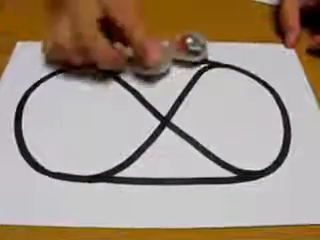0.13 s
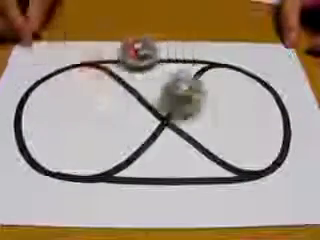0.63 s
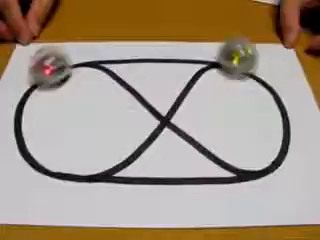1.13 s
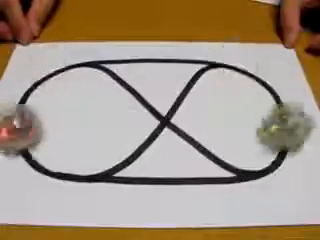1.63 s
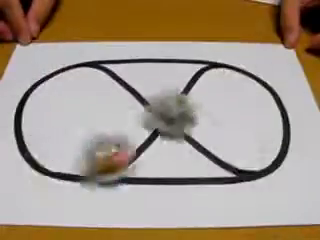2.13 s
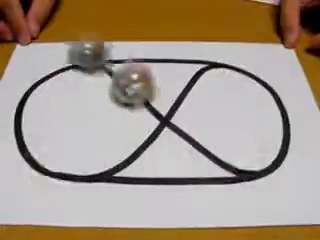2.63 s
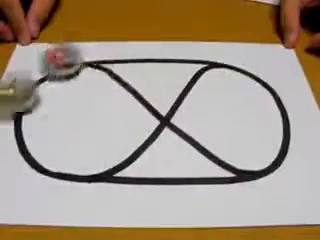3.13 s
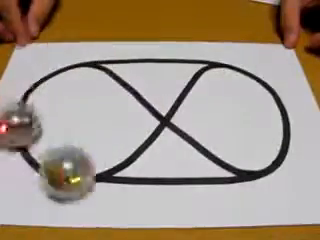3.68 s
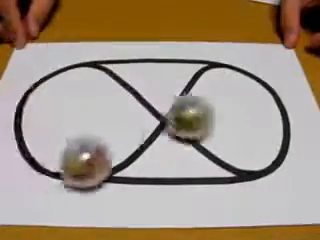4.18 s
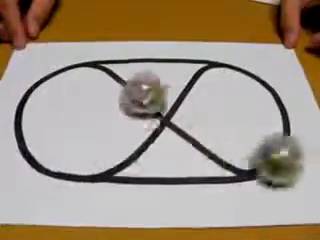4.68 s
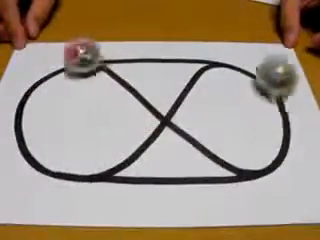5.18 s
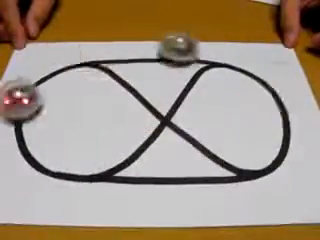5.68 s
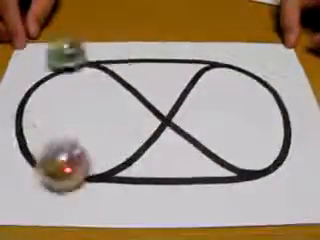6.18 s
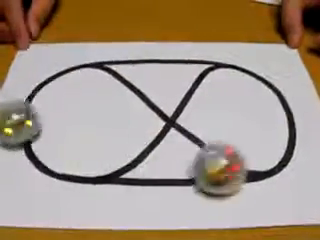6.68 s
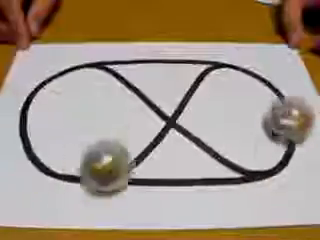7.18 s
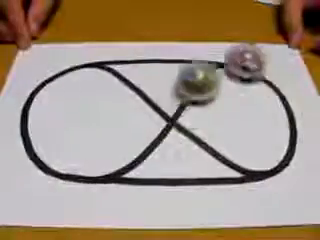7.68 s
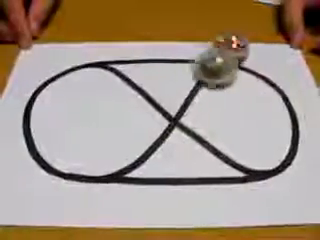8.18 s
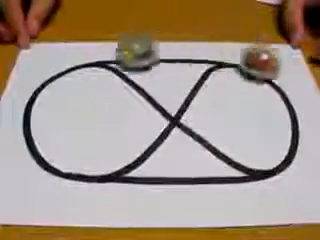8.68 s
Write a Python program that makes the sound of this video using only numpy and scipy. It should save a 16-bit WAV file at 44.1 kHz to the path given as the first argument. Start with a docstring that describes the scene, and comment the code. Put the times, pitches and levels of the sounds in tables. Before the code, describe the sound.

Two tiny geared toy robots whirr with a steady gritty hiss across paper on a wooden table, ticking, rattling, then bumping together near the end.

```python
"""Two palm-sized toy robots whirr round a sheet of paper on a wooden table, close to a stereo microphone.
From the start, random tooth contacts ring shells and gear boxes, wheels scrape paper, the table hums and rumbles.
Shells tick throughout; filtered blows bump the table near 0.45 s, a few softer ones follow.
Turns raise the gear box rattle, strongly round 4.2 s and 6.5 s.
From 7.9 s bumps crowd together and the robots shove each other, scuffing the table in three swells."""
import sys
import numpy as np
from scipy import signal
from scipy.fft import rfft, irfft, next_fast_len
from scipy.io import wavfile
from scipy.ndimage import uniform_filter1d, map_coordinates

SR = 44100
rng = np.random.default_rng(int(sys.argv[2]) if len(sys.argv) > 2 else 0)


def transcribe(u):
    """Save the signal u as a 16-bit wav file named by the first command-line argument.

    u: samples, shape (n,) or (channels, n), limited to [-1, 1]; the rate is SR.
    q: integer samples, one column per channel.
    """
    v = np.clip(np.atleast_2d(u).T, -1, 1)
    q = np.round(v * 32767).astype(np.int16)
    wavfile.write(sys.argv[1], SR, q)


def volts(x):
    """Linear amplitude factor 10**(x/20) for a level x in dB, scalar or array-like."""
    e = np.asarray(x, float) / 20
    return 10 ** e


N = 389403

# table-top modes: centre_hz, width_hz, gain_db
TABLE_MODES = [(196, 12, 6), (319.5, 17.64, 0), (500, 148, 0.5), (813, 160, -3.5), (1030, 48, -0.5)]
# table hum swells: middle_s, length_s, lowest_mode_rise_db, second_mode_rise_db
HUM_SWELLS = [(.23, 0.24, 15.5, 8), (.5, 0.38, 12.5, -1), (1.0, 0.95, 9, -1.5), (1.42, .2, 9.5, 0),
              (1.8, 0.17, 2.5, 12), (2.65, 0.7, 10.5, 4), (3.12, 0.44, 13, 3.5), (3.42, 0.54, 15.5, 6),
              (4.3, 0.35, -4, 5.5), (4.86, 0.14, 14.5, -5), (5.22, 0.16, 14, 4), (5.47, 0.34, 14, 6),
              (5.83, 0.76, 13.5, 1), (6.2, 0.13, 10.5, 1), (6.65, 0.16, 12.5, -2), (6.98, .3, 6.5, -2),
              (7.75, 0.3, 6.5, 0), (8.12, 0.75, 12.5, 10), (8.32, 0.16, 1.5, 14), (8.46, 0.24, 8, 18.5),
              (8.6, 0.17, 8, 11.5), (8.83, 0.19, 15, -9)]
# rolling rumble spectrum: freq_hz, gain_db
ROLL_SPECTRUM = [(15, -55), (40, -47), (86, -12.5), (189, -3.5), (228, -6.5), (316, -7.5), (537, -9.5),
                 (575, -9.5), (1060, -11.5), (1500, -9.5), (1950, -38), (3300, -120)]
# robots shove each other and scuff the table: middle_s, length_s, scuff_rise_db
SCUFFLES = [(8.06, .3, 16), (8.25, 0.13, 13), (8.47, .36, 17)]
# bumps on the table: start_s, level_db, lowpass_hz (higher = harder blow)
BUMPS = [(0.4417, -16, 2000), (0.458, -13, 696), (0.48, -25, 900), (0.495, -22, 600), (0.511, -25.5, 300),
         (0.536, -22, 300), (1.413, -22, 595), (3.5, -22.5, 405), (4.284, -23.5, 506), (5.464, -21, 700),
         (5.996, -25, 400), (7.915, -20.5, 1200), (8.028, -17.5, 650), (8.046, -18, 496), (8.077, -21, 900),
         (8.097, -19.5, 300), (8.212, -23.5, 595), (8.237, -24, 710), (8.375, -27, 700), (8.43, -22, 700),
         (8.45, -24.5, 500), (8.478, -22, 900), (8.53, -30.5, 690)]
# shell ticks: start_s, peak_db (ahead of the microphone)
TICKS = [(0.0416, -10.5), (0.453, -8), (0.46, -11), (1.3835, -16), (1.422, -13.5), (1.868, -8.5),
         (2.2374, -7), (2.2415, -9.5), (2.3499, -5.5), (2.8572, -12), (3.1428, -16), (3.1617, -6.5),
         (3.495, -10.5), (3.926, -13), (4.1161, -6.5), (4.262, -7.5), (4.4857, -10), (5.032, -8.5),
         (5.8106, -16.5), (6.1217, -8), (6.1623, -13), (6.43, -7), (6.519, -6.5), (6.966, -8.5),
         (7.087, -14), (7.1601, -11.5), (7.848, -12), (7.8876, -5.5), (8.0417, -10), (8.1365, -17),
         (8.3659, -12), (8.4832, -13.5), (8.678, -12)]
# heavily damped shell wall under a tick: centre_hz, width_hz, gain_db
TICK_MODES = [(2000, 600, 3.5), (3400, 900, -1.5)]
# wheels and skid on paper, spectrum: freq_hz, gain_db
PAPER_SPECTRUM = [(2500, -35.5), (4000, -6.5), (5500, -7), (6500, -7), (7200, -14.5), (7600, -16),
                  (7900, -52), (9000, -83)]
# gear box modes, response squared in use: centre_hz, width_hz, gain_db
BOX_MODES = [(3732, 540, 4), (4800, 1970, 1.5)]
# hollow shell modes, response squared in use: centre_hz, width_hz, gain_db
SHELL_MODES = [(1652, 750, 2), (2134, 670, 5.5), (2450, 633, -5.5), (2780, 497, -2.5), (3450, 720, -8.5)]
# narrow buzzing shell mode, response squared in use: centre_hz, width_hz, gain_db
BUZZ_MODE = [(1989, 240, -1.5)]
# nearness and facing of the robots: time_s, whirr_level_db, brightness_db
NEARNESS = [(0, -24.5, 1.5), (.3, -26.5, 1.5), (.65, -24, 0), (1.1, -23.5, 0), (1.22, -24, 1.5),
            (1.5, -23, 0), (2.0, -24.5, 0), (2.55, -22, -1), (3.05, -24.5, 1.5), (3.5, -22.5, 0),
            (3.85, -22, -1.5), (4.4, -24, 1), (4.9, -23, -1.5), (5.25, -25, 1), (5.6, -25.5, 2),
            (5.95, -22, 0), (6.4, -24, 0.5), (6.9, -22, -1.5), (7.4, -24.5, -2), (7.7, -25, -0.5),
            (8.0, -25, 0.5), (8.2, -23.5, -2), (8.55, -25, 0), (8.83, -25, 2)]
# a wheel labours through a turn (negative = dip): middle_s, length_s, rattle_rise_db, chatter_rise_db
TURNS = [(0.0, 0.035, 12.5, 4), (.17, 0.24, 6.5, 3), (.315, 0.027, -5.5, -4.5), (.47, 0.17, 4, -0.5),
         (.6, 0.18, 5, 1), (.87, 0.076, 5.5, 1.5), (1.0, 0.06, 7.5, 1), (1.2, 0.14, -3, -3.5),
         (1.27, 0.051, 5.5, -0.5), (1.42, 0.052, 9.5, -1.5), (1.69, 0.13, -0.5, 3), (1.89, 0.17, 5, 2),
         (2.09, 0.18, 9, 4), (2.26, 0.17, 10.5, 3.5), (2.33, 0.044, -3.5, -3.5), (2.37, 0.063, 3.5, 3.5),
         (3.0, 0.25, -0.5, 2.5), (3.17, 0.11, 6.5, 0.5), (3.48, 0.15, -1, 1), (3.95, 0.18, 7.5, 1.5),
         (4.18, 0.17, 11, 2.5), (4.35, 0.16, 9.5, 3), (4.5, 0.091, 0.5, 3), (4.62, 0.031, 0, -5.5),
         (4.7, 0.07, 0.5, 3), (5.04, 0.084, 2, -3), (5.3, 0.26, 5, 1.5), (5.5, 0.086, 7, 3),
         (5.69, 0.092, 2.5, 3.5), (6.03, 0.16, 3.5, 1), (6.21, 0.12, 6.5, 1), (6.39, 0.28, 10, 3),
         (6.53, 0.31, 12.5, 2), (6.6, 0.057, 1.5, 2), (6.64, .04, -4, -5), (6.69, 0.18, 8, 0.5),
         (6.85, 0.21, 6, 2), (6.96, 0.14, 9, 0.5), (7.1, 0.093, 4, 3), (7.19, 0.16, 2.5, 2.5),
         (7.33, 0.12, 2.5, 6), (7.385, 0.056, -2.5, -0.5), (7.47, 0.11, 0.5, 2.5), (7.57, 0.066, -2, 2),
         (7.86, 0.13, 2.5, 1.5), (7.99, 0.066, -1.5, -1.5), (8.045, 0.06, 7, 1), (8.11, 0.089, 1, 2),
         (8.675, 0.1, 6, 5.5)]
# left-right correlation: freq_hz, correlation (0-1)
LIKENESS = [(60, .9), (200, 0.98), (800, 0.94), (1250, 0.96), (2000, 0.94), (2700, 0.92), (3200, 0.98),
            (3800, 0.63), (4500, 0.3), (5500, 0.38), (7300, 0.3)]
# microphone response: freq_hz, gain_db
MIC_RESPONSE = [(20, -0.5), (6500, 1), (7300, -0.5), (7700, -18.5), (8000, -23), (9500, -87)]
# left over right capsule level: freq_hz, difference_db
CAPSULE_BALANCE = [(60, -0.5), (200, -1), (660, -1.5), (2200, 0.5), (7330, 1)]
# left over right capsule phase: freq_hz, lead_rad
CAPSULE_LEAD = [(900, 0), (1900, .17), (2700, .15), (3500, .04), (7500, -.02)]


def unit(x):
    """Scaled to rms 1."""
    return x / np.sqrt(np.mean(x ** 2) + 1e-20)


def along(points, hz):
    """(freq_hz, value) points interpolated on a log-frequency axis."""
    point_hz, value = np.transpose(points)
    return np.interp(np.log(hz + 1), np.log(point_hz + 1), value)


def curves(rows):
    """One value per sample for each column after time_s."""
    time_s, *columns = np.transpose(rows)
    return [np.interp(np.arange(N) / SR, time_s, column) for column in columns]


def swells(rows):
    """Sum of raised-cosine swells; one dB curve per column after middle_s, length_s."""
    out = np.zeros((len(rows[0]) - 2, N))
    for middle_s, length_s, *rise_db in rows:
        first = max(int((middle_s - length_s / 2) * SR), 0)
        last = min(int((middle_s + length_s / 2) * SR), N)
        k = np.arange(first, last)
        out[:, k] += np.outer(rise_db, np.cos(np.pi * (k / SR - middle_s) / length_s) ** 2)
    return out


def wobble(knots_per_s):
    """Smooth random curve: spline through Gaussian knots."""
    knots = rng.standard_normal(int(N * 200 / SR))
    return map_coordinates(knots, [np.arange(N) * min(knots_per_s, 190) / SR])


def noise():
    """White noise, direct and scattered."""
    return rng.standard_normal((2, N))


def filtered(x, response):
    """x through a complex frequency response."""
    size = next_fast_len(N + SR // 2)
    return irfft(rfft(x, size) * response(np.fft.rfftfreq(size, 1 / SR)), size)[..., :N]


def shaped(x, spectrum):
    """x through a (freq_hz, gain_db) spectrum."""
    return filtered(x, lambda hz: volts(along(spectrum, hz)))


def modes(table):
    """Causal response of parallel resonances, alternating in sign."""
    def response(hz):
        total = 0
        for k, (centre_hz, width_hz, gain_db) in enumerate(table):
            damping = 1j * hz * width_hz
            total = total + (-1) ** k * volts(gain_db) * damping / (centre_hz ** 2 - hz ** 2 + damping)
        return total
    return response


def steep(table):
    """Squared modal response: steep skirts, as a small shell radiates no bass."""
    return lambda hz: modes(table)(hz) ** 2


def contacts(per_s, spread_db):
    """Direct and scattered: two unrelated random impulse trains; spread_db scales an exponential level draw."""
    hit = rng.random((2, N)) < per_s / SR
    draw = np.minimum(rng.exponential(size=(2, N)), 4)
    return unit(hit * rng.standard_normal((2, N)) * volts(spread_db * draw))


def shifting(x, fine_db, wide_db):
    """Random shifting colour: random gain ripples over narrow and wide bands, drifting in time; rms 1."""
    z = signal.stft(x, nperseg=2048)[2]

    def field(bins, frames):
        grain = uniform_filter1d(rng.standard_normal(z.shape[1:]), bins, 0)
        return unit(uniform_filter1d(grain, frames, 1))

    gain_db = fine_db * field(bins=2, frames=4) + wide_db * field(bins=12, frames=7)
    return unit(signal.istft(z * volts(gain_db), nperseg=2048)[1][:, :N])


def spread(pair):
    """Direct and scattered signals become left and right with the tabled correlation."""
    def angle(hz):
        return np.arccos(np.clip(along(LIKENESS, hz), -1, 1)) / 2

    mid, side = filtered(pair, lambda hz: np.array([np.cos(angle(hz)), np.sin(angle(hz))]))
    return np.array([mid + side, mid - side])


def deep_bass():
    """Lumpy low-passed noise."""
    lumpy = volts(3 * wobble(3.6)) * noise()
    return volts(-63.5) * unit(filtered(lumpy, lambda hz: (hz > 18) / (1 + (hz / 90) ** 4)))


def rolling_rumble():
    """Wheels rolling: shaped noise of wavering level."""
    roll = shifting(shaped(noise(), ROLL_SPECTRUM), fine_db=2.0, wide_db=0.28)
    return volts(-37.5 + 0.98 * wobble(13) + 0.9 * wobble(5)) * roll


def hum(centre_hz, width_hz, waver, lumpy_db):
    """Motor-driven table mode: lumpy tone wavering by a share of its width, direct and scattered."""
    cycles = [np.cumsum(centre_hz + waver * width_hz * wobble(14)) / SR for _ in range(2)]
    return np.sqrt(2) * volts(lumpy_db * wobble(25)) * np.sin(2 * np.pi * np.array(cycles))


def table_hum():
    """Motor shaking hums in the two lowest table modes and swells."""
    low_db, second_db = swells(HUM_SWELLS)
    low = hum(*TABLE_MODES[0][:2], waver=0.6, lumpy_db=2.4)
    second = hum(*TABLE_MODES[1][:2], waver=0.5, lumpy_db=3)
    return volts(-55 + low_db) * low + volts(-55 + second_db) * second


def scuffing():
    """Sparse contacts ring the middle table modes, louder as the robots shove each other."""
    scuff = unit(filtered(contacts(300, spread_db=2.0), steep(TABLE_MODES[1:4])))
    return volts(-56.5 + swells(SCUFFLES)[0]) * scuff


def bumps():
    """Low-passed blow plus decaying chatter rings all table modes and a broad bass shudder."""
    chatter_t60_s, strike_over_chatter_db = 0.09, 11.5
    push = np.zeros((2, N + SR))
    t_s = np.arange(SR // 5) / SR
    for start_s, level_db, lowpass_hz in BUMPS:
        soft = signal.butter(2, lowpass_hz, fs=SR)
        strike = signal.lfilter(*soft, t_s == 0)
        chatter = unit(signal.lfilter(*soft, rng.standard_normal((2, len(t_s)))))
        chatter = chatter * volts(-60 * t_s / chatter_t60_s)
        blow = chatter + volts(strike_over_chatter_db) * strike / strike.max()
        push[:, round(start_s * SR):][:, :len(t_s)] += volts(level_db - 5.5) * blow
    shudder = modes([(60, 60, -14.5)])  # centre_hz, width_hz, gain_db
    return filtered(push[:, :N], lambda hz: modes(TABLE_MODES)(hz) + shudder(hz))


def ticks():
    """Each tick is a hard blow and one bounce on the damped shell wall."""
    low_hz, high_hz, bounce_s = 1500, 4500, 0.00095
    blow, starts = np.zeros(N), np.zeros(N)
    blow[[0, round(bounce_s * SR)]] = 1, 0.6

    def wall(hz):
        return modes(TICK_MODES)(hz) * hz / (hz - 1j * low_hz) / (1 + 1j * hz / high_hz)

    tick = filtered(blow, wall)[:SR // 20]
    for start_s, peak_db in TICKS:
        starts[round(start_s * SR)] = volts(peak_db)
    return signal.fftconvolve(starts, tick / np.abs(tick).max())[:N]


def paper_scrape(bright_db, turn_db):
    """Wheels and skid on paper: dense contacts, shaped, rising with part of the turn's rattle."""
    scrape = shifting(shaped(contacts(8000, spread_db=2.5), PAPER_SPECTRUM), fine_db=3.0, wide_db=2.5)
    level_db = -10.5 + 1.9 * bright_db + 0.49 * np.outer([1, 0.3], turn_db)  # direct, scattered
    return volts(level_db + 1.6 * wobble(22) + 0.83 * wobble(6.4)) * scrape


def gear_box(teeth, bright_db, turn_db):
    """Tooth contacts rattle the gear box, mostly direct; sparser hard ones click in it."""
    drive = teeth + 0.99 * contacts(2500, spread_db=3.0)
    rattle = shifting(filtered(drive, steep(BOX_MODES)), fine_db=2.5, wide_db=2.5)
    rattle = rattle * volts([[0], [-6.5]])  # direct, scattered
    clicks = unit(filtered(contacts(500, spread_db=2.5), steep(BOX_MODES)))
    clicks = clicks * volts([[0], [-9]])
    rattle_db = -11.5 + 0.5 * bright_db + turn_db + 1.3 * wobble(30)
    return volts(rattle_db) * rattle + volts(-17 + 1.05 * turn_db) * clicks


def shells(teeth, bright_db, chatter_db):
    """Tooth contacts ring lower and upper shell modes; sparser ones knock; the load flutters."""
    flutter = wobble(20)
    lower = filtered(teeth, lambda hz: steep(SHELL_MODES[:2])(hz) + steep(BUZZ_MODE)(hz))
    lower = shifting(lower, fine_db=4.0, wide_db=1.0)
    upper = shifting(filtered(teeth, steep(SHELL_MODES[2:])), fine_db=2.5, wide_db=0.83)
    knocks = unit(filtered(contacts(450, spread_db=-0.5), steep(SHELL_MODES)))
    # shells turned to the microphone: upper modes up, lower modes down
    lower_db = -5 - 0.46 * bright_db + chatter_db + 0.16 * flutter + 0.45 * wobble(6.5)
    upper_db = -4 + bright_db + 0.86 * chatter_db + 0.43 * flutter + 0.41 * wobble(6.8)
    return volts(lower_db) * lower + volts(upper_db) * upper + volts(-11 + 1.1 * chatter_db) * knocks


def robots():
    """The same tooth contacts drive shells and gear box; nearness scales them and the scrape."""
    near_db, bright_db = curves(NEARNESS)
    turn_db, chatter_db = swells(TURNS)
    teeth = contacts(5000, spread_db=-1.0)
    whirr = paper_scrape(bright_db, turn_db)
    whirr = whirr + gear_box(teeth, bright_db, turn_db)
    whirr = whirr + shells(teeth, bright_db, chatter_db)
    return volts(near_db) * whirr


def scene():
    """Table and robots spread in stereo, ticks in the centre."""
    table = deep_bass() + rolling_rumble() + table_hum() + scuffing() + bumps()
    return spread(table + robots()) + ticks()


def low_pass(x):
    """Removes everything above the highest recorded frequency."""
    return signal.sosfilt(signal.butter(12, 7930, fs=SR, output="sos"), x)


def record(dry):
    """Slightly unequal capsules with a steep treble limit."""
    half = np.array([[0.5], [-0.5]])  # left, right share of each difference

    def capsules(hz):
        gain_db = along(MIC_RESPONSE, hz) + half * along(CAPSULE_BALANCE, hz)
        return volts(gain_db) * np.exp(1j * half * along(CAPSULE_LEAD, hz))

    mix = filtered(dry, capsules)
    return low_pass(mix)


dry = scene()
out = record(dry)
transcribe(out)
```